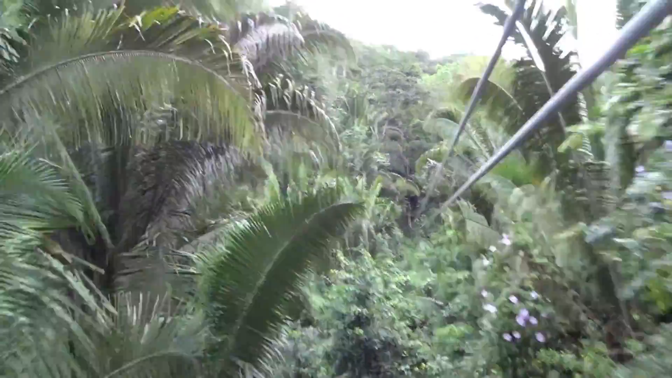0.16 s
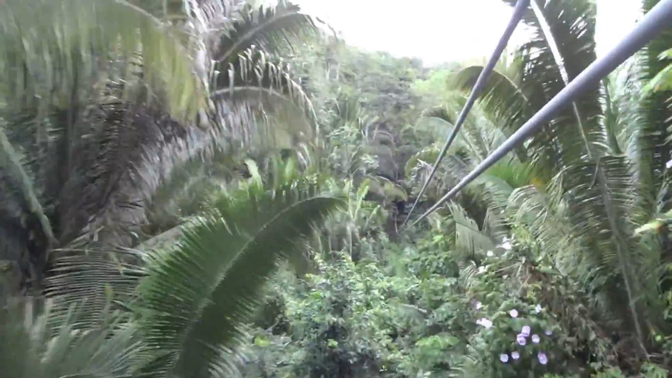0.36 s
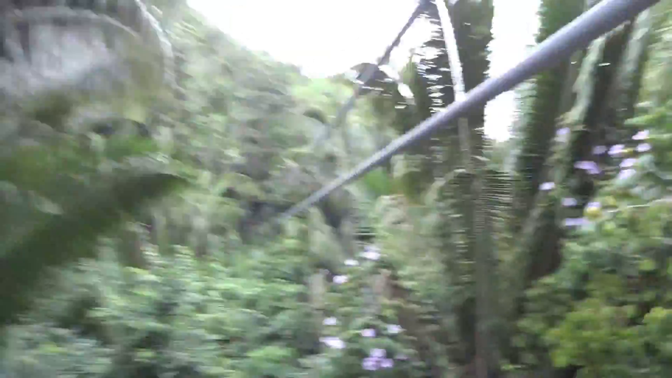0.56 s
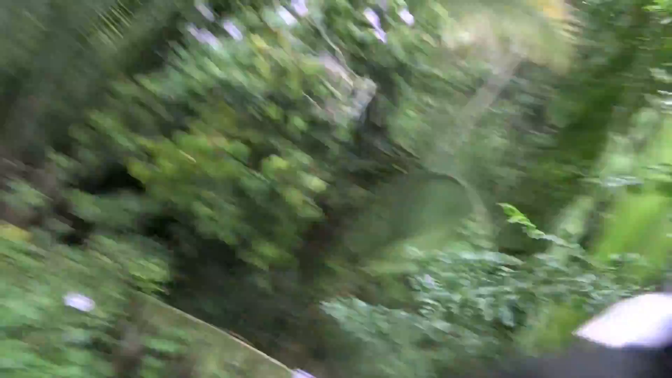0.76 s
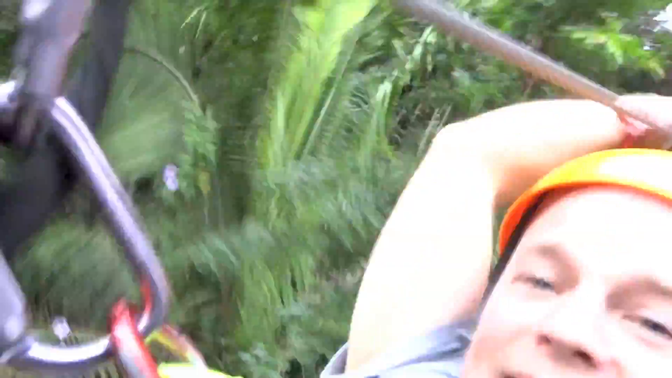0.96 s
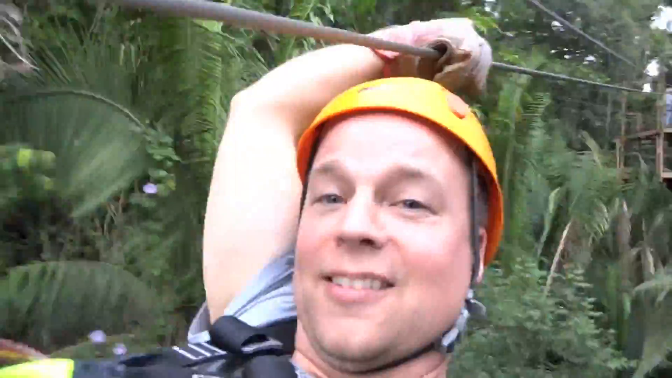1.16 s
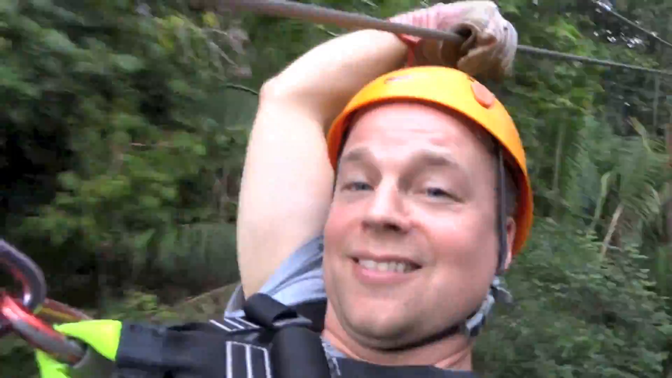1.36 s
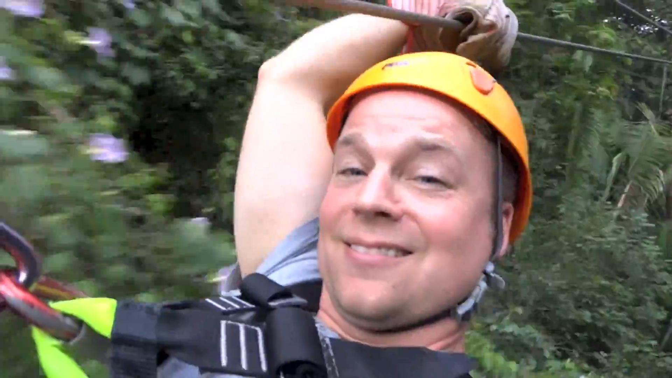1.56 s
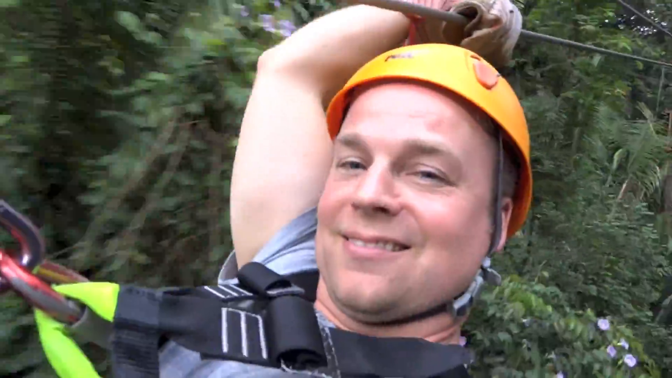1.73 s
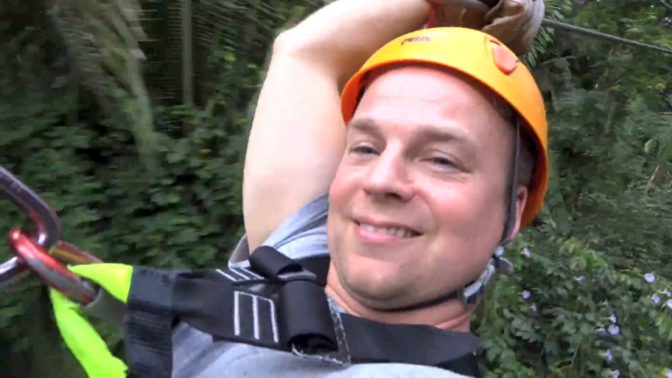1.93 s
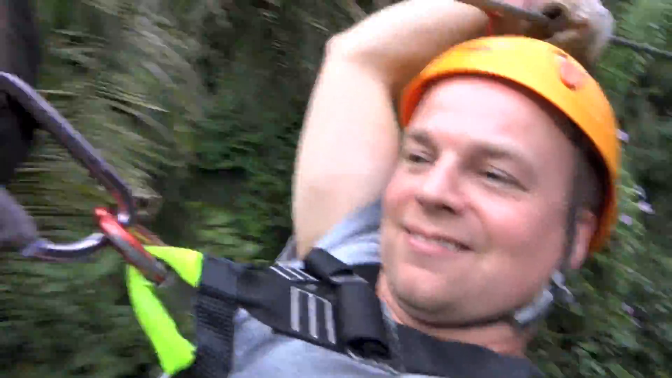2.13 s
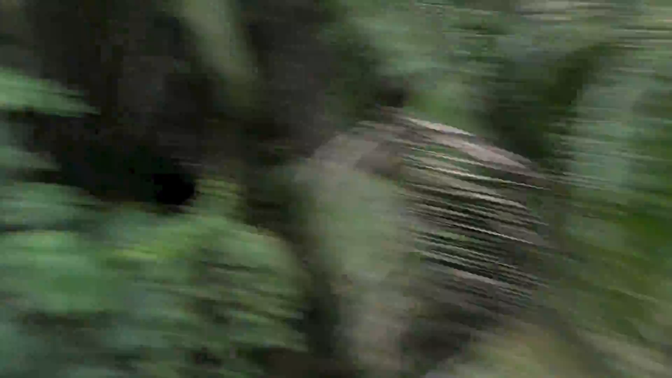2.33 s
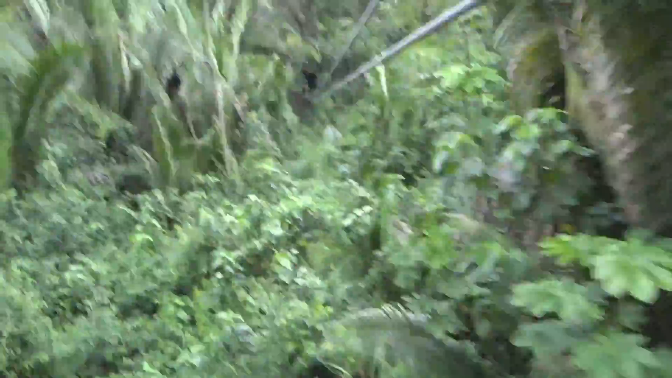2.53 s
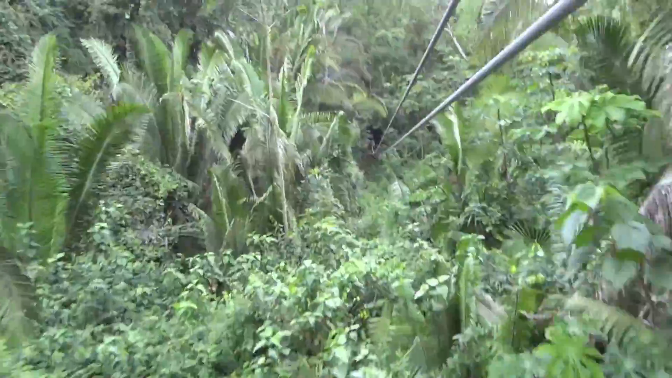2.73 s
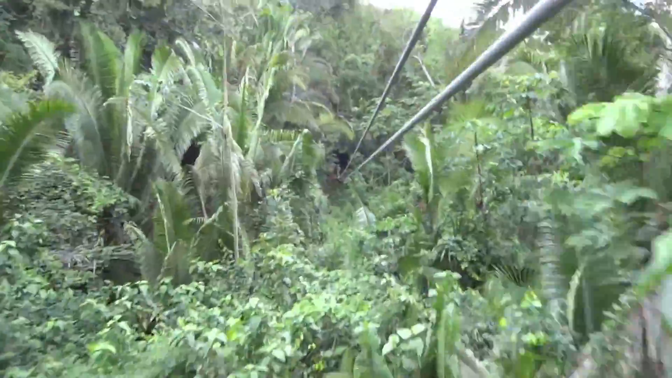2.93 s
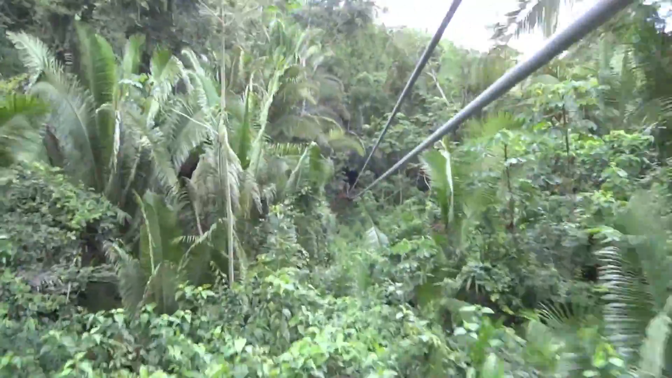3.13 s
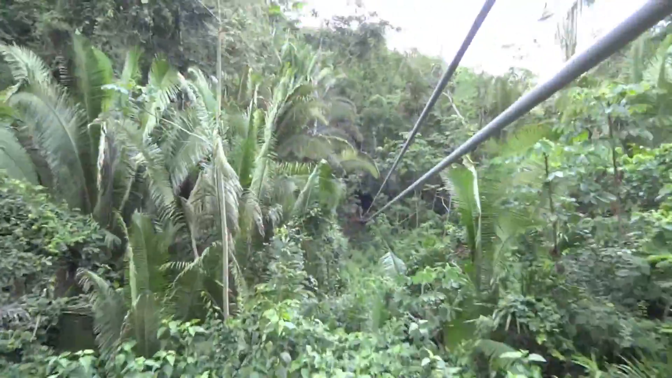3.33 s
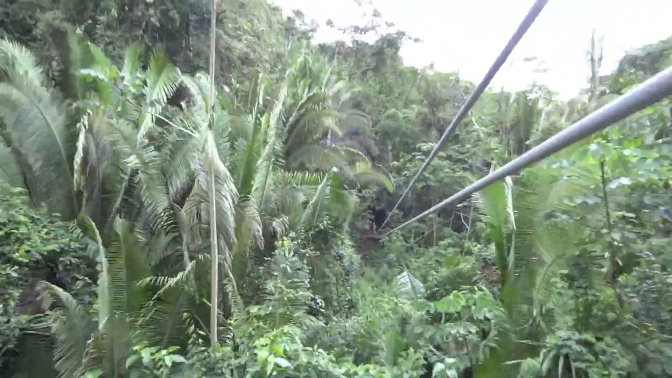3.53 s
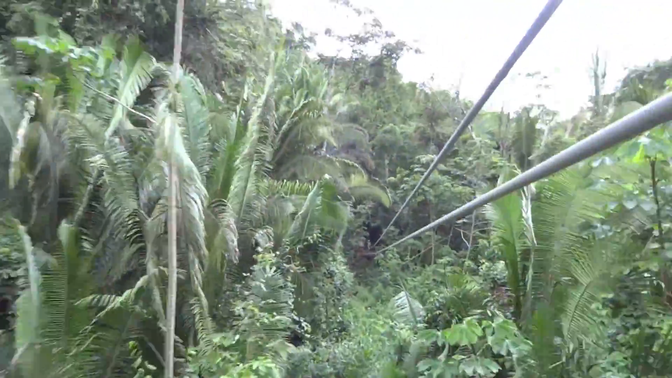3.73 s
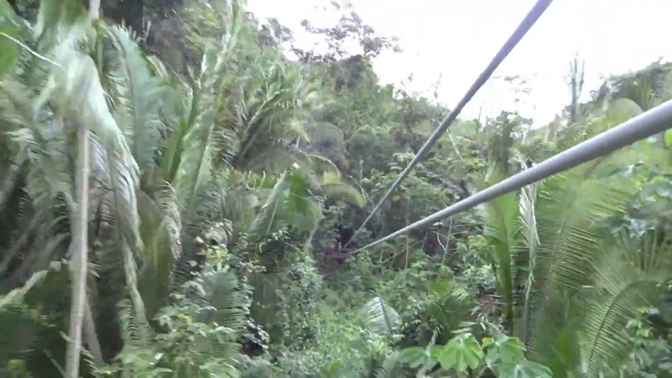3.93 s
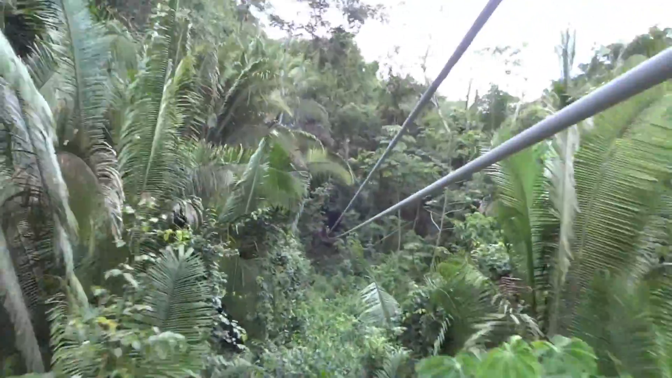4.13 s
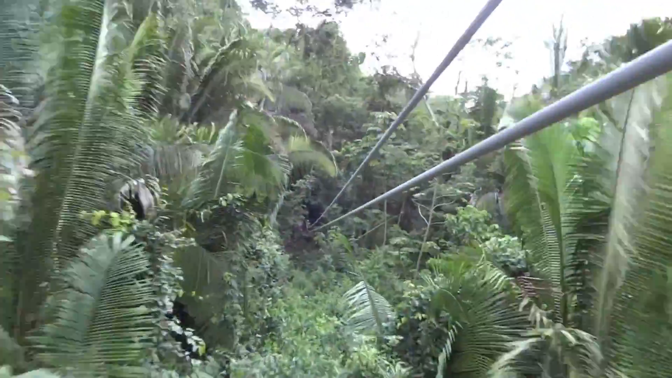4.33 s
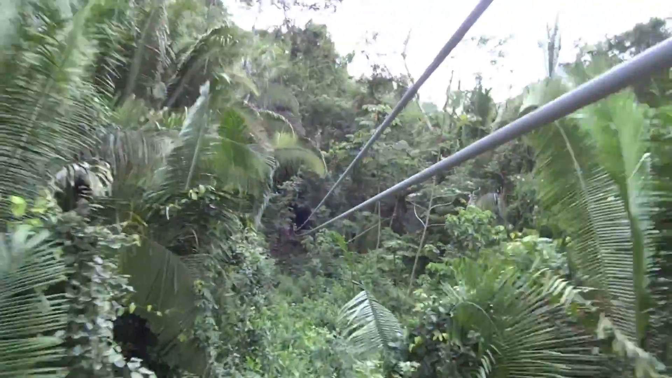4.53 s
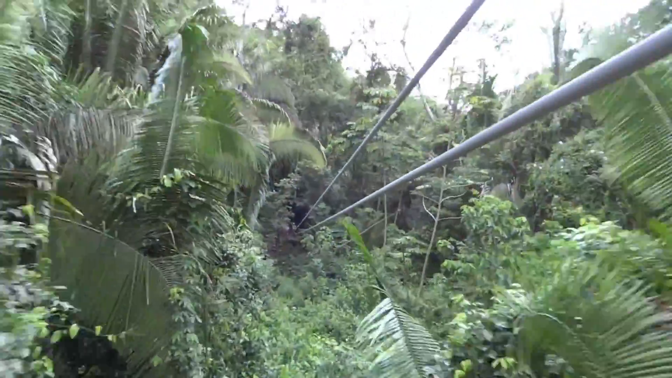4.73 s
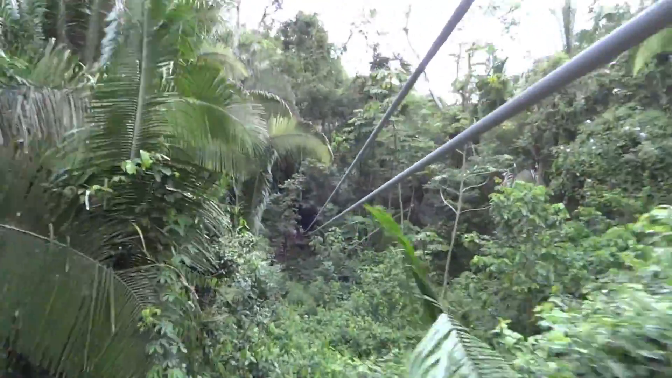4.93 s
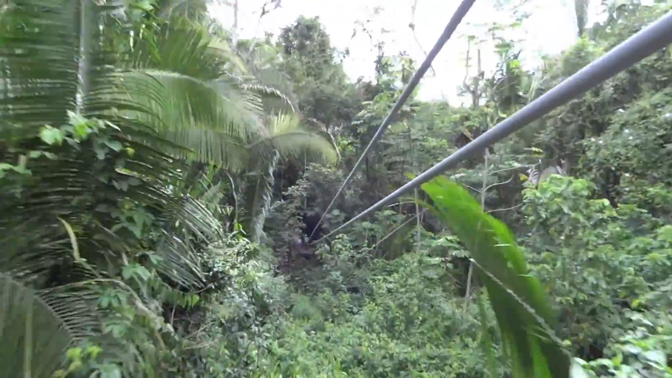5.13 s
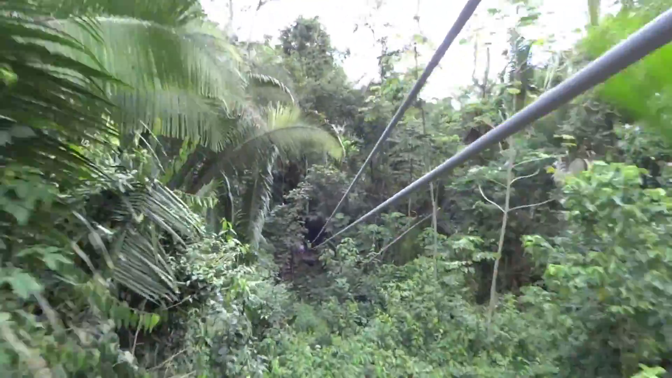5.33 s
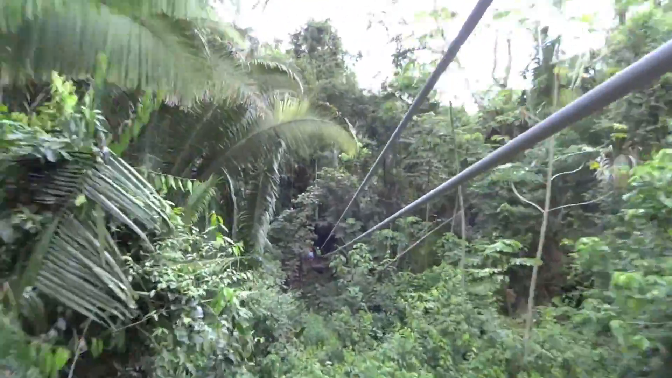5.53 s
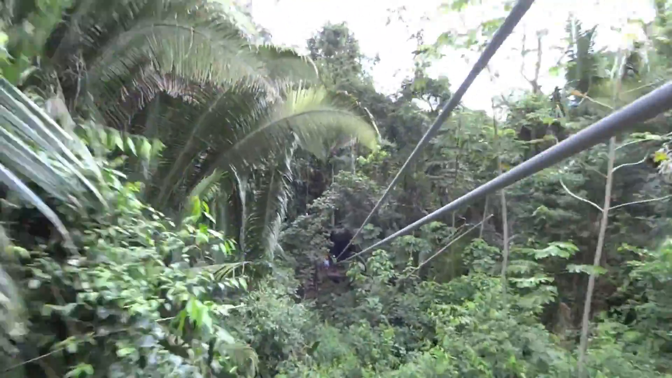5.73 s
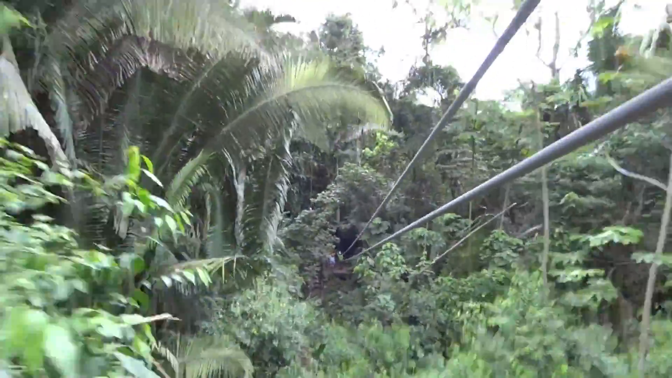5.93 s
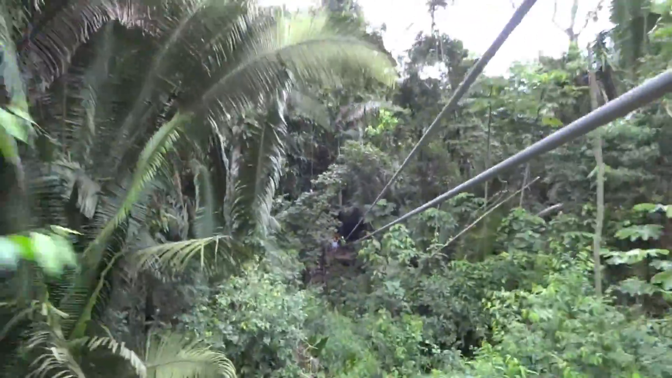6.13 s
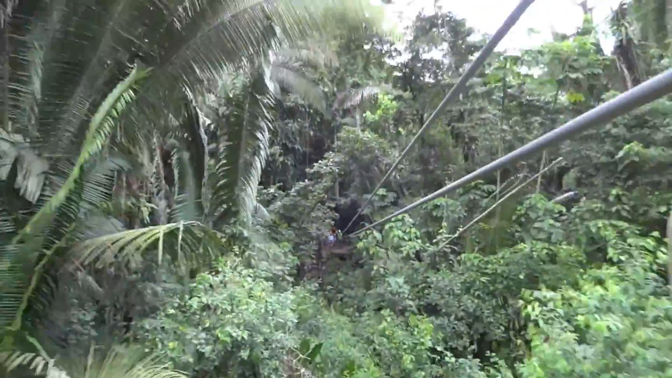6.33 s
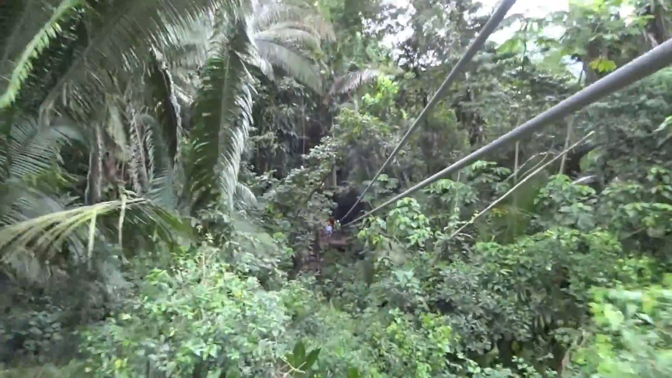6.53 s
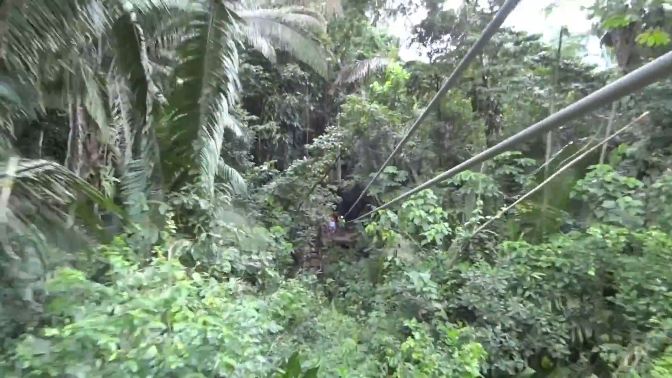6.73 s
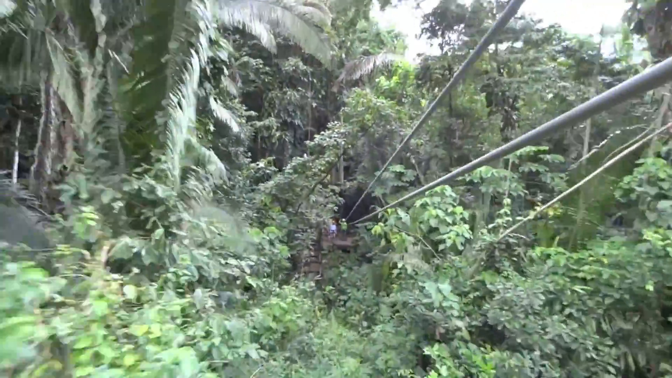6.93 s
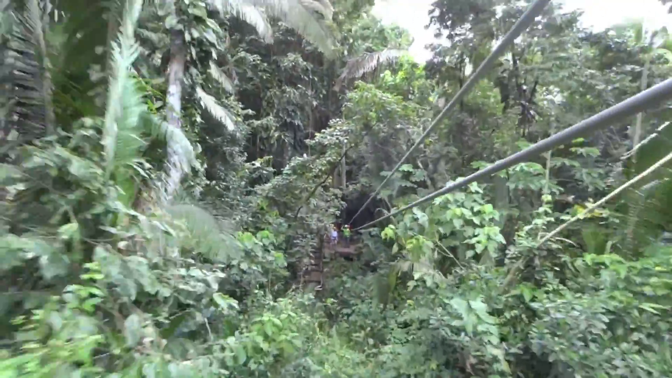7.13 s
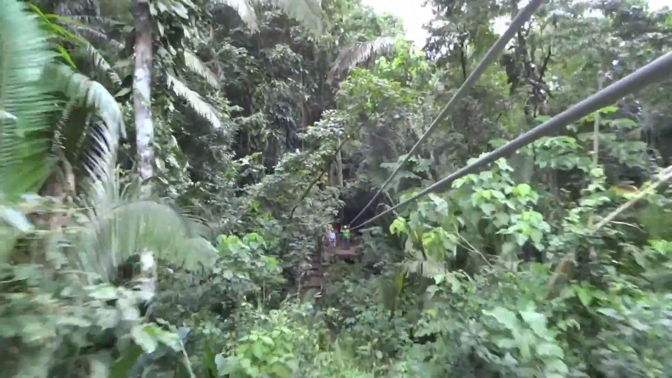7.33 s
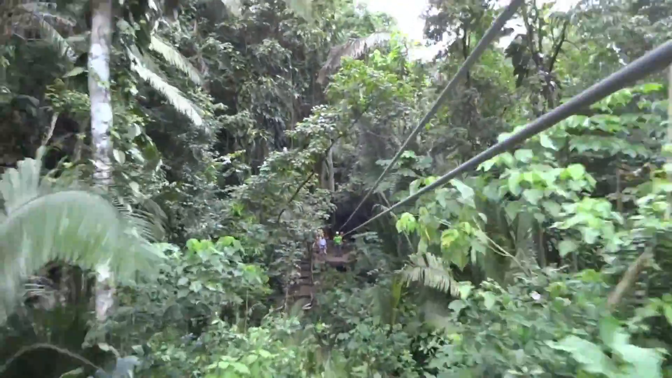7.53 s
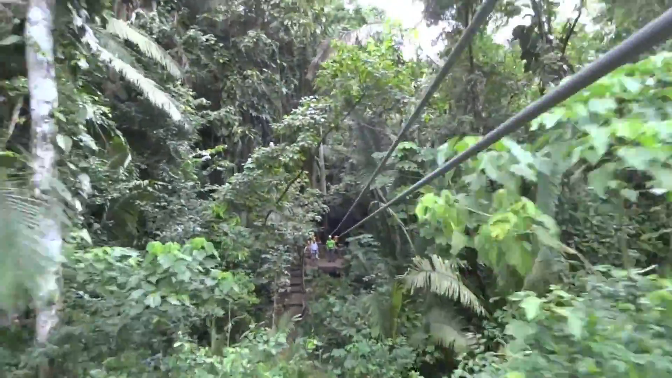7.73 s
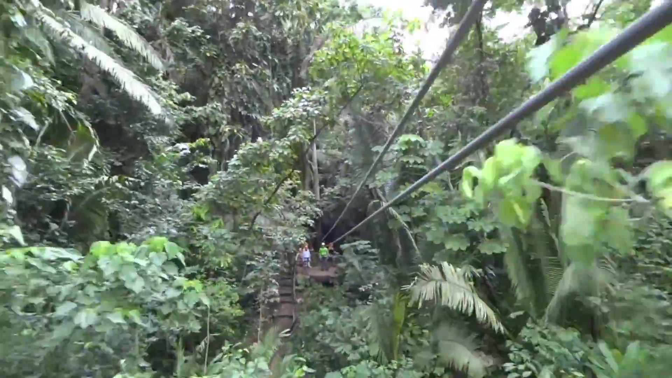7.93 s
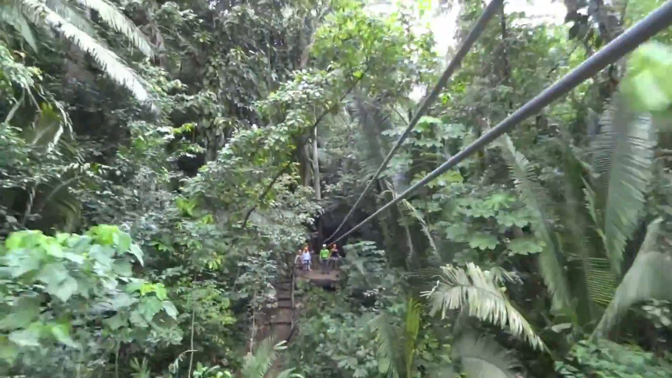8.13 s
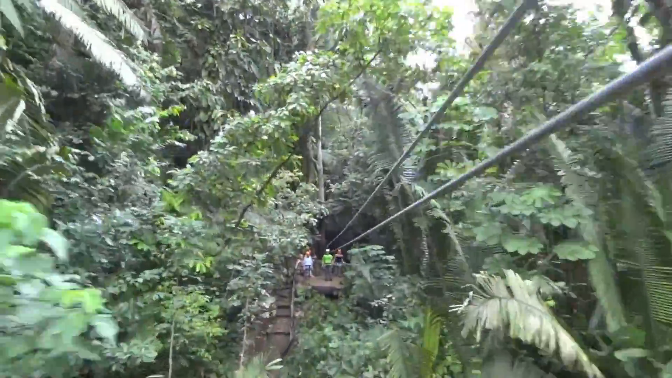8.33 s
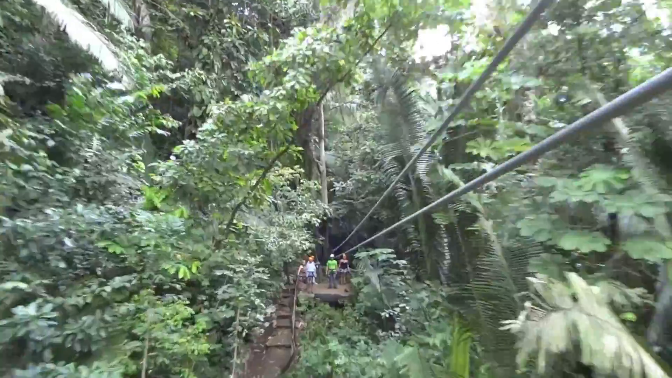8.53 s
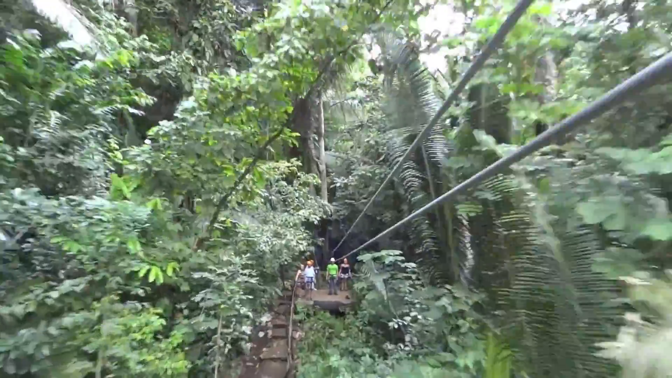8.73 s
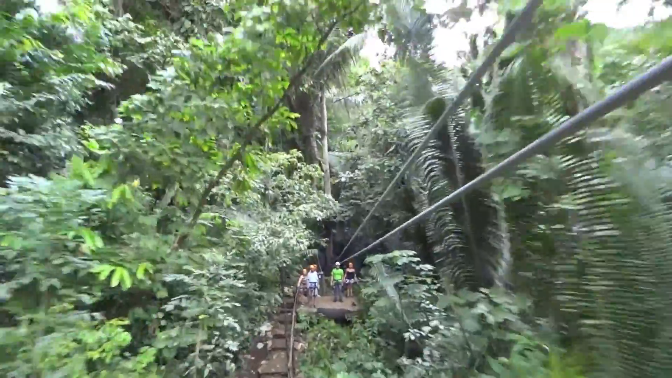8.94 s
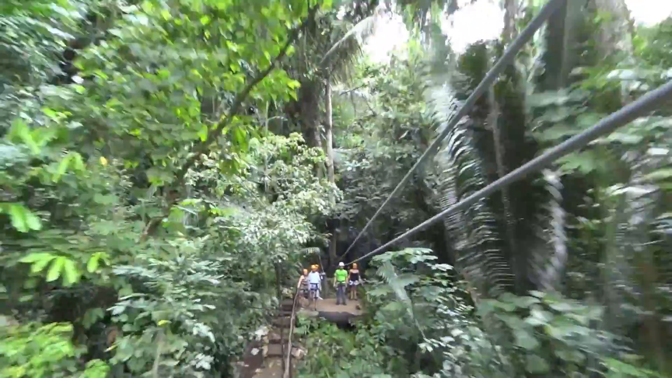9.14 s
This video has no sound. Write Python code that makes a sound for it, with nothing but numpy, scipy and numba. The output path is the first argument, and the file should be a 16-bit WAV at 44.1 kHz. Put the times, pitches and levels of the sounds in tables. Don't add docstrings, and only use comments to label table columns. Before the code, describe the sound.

Zip-line trolley wheels whir and sing shrilly along a steel cable, with low wind buffeting the microphone and bright air rushing past outdoors.

```python
import sys
import numpy as np
from scipy import signal
from scipy.fft import rfft, irfft, next_fast_len
from scipy.io import wavfile
from scipy.ndimage import uniform_filter1d
from numba import njit

SR = 44100
rng = np.random.default_rng(int(sys.argv[2]) if len(sys.argv) > 2 else 0)


def field_ratio(decibels):
    return 10 ** (np.asarray(decibels, dtype=float) / 20)


def waveform_to_disk(signal):
    frames = np.transpose(np.atleast_2d(signal))
    scaled = np.clip(frames, -1, 1) * 32767
    samples = np.round(scaled).astype(np.int16)
    wavfile.write(sys.argv[1], SR, samples)


N = 408807
SECONDS = np.arange(N) / SR
HZ = np.maximum(np.arange(N // 2 + 1) * SR / N, 1)

# time in seconds, centre in Hz.
CHATTER_HZ = [(0, 2960), (.2, 3000), (.3, 3020), (.42, 3470), (.5, 3040), (.56, 2680), (.62, 3300),
              (.7, 3400), (.8, 3300), (1, 3590), (9.27, 3550)]
# time in seconds, level in dB.
APART = [(0, -18), (.6, -17), (.68, 1), (9.27, -0.5)]
# time in seconds, share from 0 to 1.
TURNED = [
    (0, 0.04),
    (.9, 0.08),
    (.97, 0.28),
    (1.3, 0.94),
    (2.3, 0.91),
    (2.4, 0.64),
    (2.52, 0.16),
    (2.8, 0),
    (9.27, 0.02),
]


def rms_one(x):
    return x / np.sqrt(np.mean(x ** 2) + 1e-20)


def in_time(rows):
    s, *columns = np.transpose(rows)
    return [np.interp(SECONDS, s, c) for c in columns]


def at_hz(points):
    hz, value = np.transpose(points)
    return np.interp(np.log(HZ), np.log(hz), value)


def bumps(rows):
    s, *db, half = np.transpose(rows)
    distance = (SECONDS - s[:, None]) / half[:, None]
    return np.array(db) @ np.exp(-distance ** 2)


def colour(x, gain):
    return irfft(rfft(x) * gain, N)


def low_pass(x, hz):
    return signal.sosfilt(signal.butter(4, hz, fs=SR, output="sos"), x)


def drift(rate_hz):
    return rms_one(colour(rng.standard_normal(N), 1 / (1 + (HZ / rate_hz) ** 2)))


def envelope(x):
    return np.abs(signal.hilbert(x, next_fast_len(N))[..., :N])


def modes(x, table):
    out = 0
    for k, (hz, width_hz, level_db) in enumerate(table):
        r = np.exp(-1.55 * np.pi * width_hz / SR)
        b = (1 - r * r) / 2 * np.array([1, 0, -1])
        a = [1, -2 * r * np.cos(2 * np.pi * hz / SR), r * r]
        ringing = signal.lfilter(b, a, signal.lfilter(b, a, x))
        out = out + (-1) ** k * field_ratio(level_db) * ringing
    return out


@njit
def gliding(x, turn, r):
    out = np.zeros(len(x))
    for i in range(2, len(x)):
        c = 2 * r * np.cos(turn[i])
        out[i] = (1 - c + r * r) * x[i] + c * out[i - 1] - r * r * out[i - 2]
    return out


def ports(left, right, lag):
    # frequency in Hz, left louder in dB.
    stream_left_db = [(300, 8), (600, 0), (1200, 0.5), (3000, 1), (4500, 4), (5400, 6.5), (7000, 14),
                      (8500, -2), (9700, 6), (10800, 0.5)]
    still_left_db = [(300, -7), (2000, 3.5), (3330, 2.5), (5500, 8), (7600, 7), (9700, 10), (11000, -2),
                     (15000, -9)]
    # frequency in Hz, phase in radians.
    still_lag = [(2070, 0.05), (5080, 1.24), (6120, 2.6), (7240, 4.8), (9730, 4.1), (12300, 3.2),
                 (13100, 5.2), (15500, 5.9)]
    streaming = np.interp(SECONDS, [APART[1][0], APART[2][0]], [0, 1])
    out = 0
    for share, left_db, rad in ((streaming, stream_left_db, lag), (1 - streaming, still_left_db, still_lag)):
        tilt = field_ratio(at_hz(left_db) / 2) * np.exp(.5j * at_hz(rad))
        out = out + np.array([colour(left * share, tilt), colour(right * share, 1 / tilt)])
    return out


def stereo_noise(spectrum, likeness):
    alike, gain = np.clip(at_hz(likeness), 0, 1), field_ratio(at_hz(spectrum))
    mid, side = rng.standard_normal((2, N))
    mid = colour(mid, gain * np.sqrt(1 + alike))
    side = colour(side, gain * np.sqrt(1 - alike))
    scale = np.sqrt(np.mean(mid ** 2))
    return mid / scale, side / scale * field_ratio(in_time(APART)[0])


def wheel_levels():
    # time in seconds, plate level in dB.
    bite = [(0, -32.5), (.3, -31), (.48, -37), (.6, -37), (.72, -22.5), (.85, -20), (1.3, -18.7),
            (2.2, -19), (2.9, -21), (3.8, -19.5), (5.7, -18.5), (6.5, -19.5), (9.27, -20)]
    # time in seconds, level in dB.
    rim_level = [(0, -46), (.3, -44), (.4, -38), (.58, -44), (.66, -28), (.9, -27), (1.1, -30), (2.3, -31),
                 (2.65, -29), (3.0, -33), (3.9, -28), (4.5, -29), (5.3, -26.5), (5.9, -23), (7.3, -25),
                 (9.27, -22.5)]
    # time in seconds, chatter in dB, rim in dB, half length in seconds.
    patches = [(.12, 2, 7, 0.11), (.62, 1, 1.5, 0.089), (1.0, 3, 1, 0.33), (4.25, -0.5, 4, .07),
               (4.73, -0.5, 4.5, .12), (6.45, .3, 1.5, .15), (7.95, 2, 1, .2), (8.15, 0.5, -2.5, .08),
               (8.35, 2, 0, 0.055), (8.55, .5, -2.5, 0.087), (8.75, -0.5, 1.5, .07), (9.05, .5, 4, 0.036)]
    bite_db = in_time(bite)[0]
    patch_db, ring_db = bumps(patches)
    full_bite_db, rim_turned_db = -19, 12.5
    chatter_db = -29.5 + np.minimum(-.5 * (bite_db - full_bite_db), 7.5) + 0.16 * SECONDS
    rim_db = in_time(rim_level)[0] + rim_turned_db * in_time(TURNED)[0] + ring_db
    return chatter_db + patch_db, rim_db, bite_db


def low_chatter(front, rear):
    # frequency in Hz, width in Hz, level in dB.
    frame_modes = [(3303, 48, 3), (6650, 500, -19.5)]
    width_hz = 1056
    turn, r = 2 * np.pi * in_time(CHATTER_HZ)[0] / SR, np.exp(-np.pi * width_hz / SR)
    thin = signal.sosfilt(signal.butter(2, 1400.0, "high", fs=SR, output="sos"), front)
    band = low_pass(gliding(gliding(thin, turn, r), turn, r), 4120.0)
    return rms_one(band + field_ratio(16.5) * modes(rear, frame_modes))


def singing_rim(front, rear):
    # frequency in Hz, width in Hz, level in dB.
    rim_pair = [(3680, 57.5, 9.5), (3705, 200, -2.5)]
    high_pair = [(11780, 220, -23), (12340, 160, -23)]
    steadiness, steady_s = .55, .12
    sing = modes(front, rim_pair) + modes(rear, high_pair)
    held = uniform_filter1d(envelope(sing), size=int(steady_s * SR))
    return rms_one(sing / held ** steadiness * field_ratio(0.27 * drift(12.0)))


def side_plates(rear, plates_db):
    # frequency in Hz, width in Hz, level in dB.
    plate_modes = [(4414, 1290, -8.5), (4770, 360, 0), (5184, 310, -3)]
    plate_overtone = [(9740, 580, -12.5)]
    evenness = .3
    plates = rms_one(modes(rear, plate_modes))
    plates = plates / (envelope(plates) + 0.052) ** evenness
    plates = rms_one(low_pass(low_pass(plates, 5800.0), 6840.0))
    overtone_db = 13.0 + 0.36 * (plates_db + 20.5) + 1 * in_time(TURNED)[0]
    return plates + field_ratio(overtone_db) * modes(rear, plate_overtone)


def trolley():
    chatter_db, rim_db, plates_db = wheel_levels()
    contacts_per_s = 12000.0
    front, rear = rng.standard_normal((2, N)) * (rng.random((2, N)) < contacts_per_s / SR)
    whir = field_ratio(chatter_db) * low_chatter(front, rear)
    whir = whir + field_ratio(rim_db - 0.23) * singing_rim(front, rear)
    whir = whir + field_ratio(plates_db - 2.0) * side_plates(rear, plates_db)
    overload, knee = .5, 2.0
    return whir / (1 + (envelope(whir) / overload) ** knee) ** (1 / knee)


def growl():
    # frequency in Hz, width in Hz, level in dB.
    hanger_modes = [(1600, 900, -6), (1935, 150, 2), (14300, 500, -17)]
    contacts = rng.standard_normal((3, N)) * (rng.random((3, N)) < 8000.0 / SR)
    groan = sum(modes(c, [mode]) for c, mode in zip(contacts, hanger_modes))
    low_hz, span_hz, fade_db = 2680, 853, 19.5
    risen = (in_time(CHATTER_HZ)[0] - low_hz) / span_hz
    return field_ratio(-23 - fade_db * risen ** 2 - 8.5) * rms_one(groan)


def wind_levels():
    # time in seconds, level in dB.
    headwind = [(0, -29.5), (.3, -28.5), (.9, -32.5), (2.5, -28), (2.75, -26), (3.6, -26.5), (4.0, -26),
                (4.7, -27), (5.5, -26), (7.4, -27), (8.1, -28), (9.27, -28)]
    # time in seconds, roar in dB, rumble in dB, half length in seconds.
    puffs = [(.14, 1, -6, 0.073), (.44, 6.5, 5, 0.056), (.66, 2, -1, .06), (.88, 2.5, 9, 0.052),
             (1.14, 3, 3, 0.041), (1.65, 0, 4, .03), (1.75, -2, 3, .03), (2.17, 0.5, 5, .04),
             (2.435, 12.5, 9.5, 0.034), (2.64, 2.5, -3, 0.057), (2.95, 0.5, 5, 0.1), (3.3, 1, 3, 0.052),
             (3.6, 1.5, 4, 0.071), (4.15, 0, 0, 0.13), (4.93, -1, 4, .08), (5.45, 1.5, 3.5, .1)]
    shelter_db, sheltered_rumble_db = -13.5, -43
    roar_db = in_time(headwind)[0] + shelter_db * in_time(TURNED)[0]
    roar_puff, rumble_puff = bumps(puffs)
    rumble_db = np.maximum(-35.5 + 0.71 * (roar_db + 27.5), sheltered_rumble_db)
    rumble_db = rumble_db + 1.4 * drift(5.6) + rumble_puff
    edge_db = -38.0 + 0.8 * (roar_db + 27.0) + 1.3 * roar_puff + 0.71 * in_time(APART)[0]
    return rumble_db, roar_db + roar_puff, edge_db


def wind():
    # frequency in Hz, level in dB per Hz.
    rumble_colour = [(20, -22), (40, -11.5), (70, -3.5), (110, -1), (160, -4.5), (300, -22), (600, -59)]
    roar_colour = [(70, -46), (130, -3.5), (200, -1), (320, -0.5), (500, -4.5), (800, -9.5), (1200, -22),
                   (2000, -22), (4000, -51)]
    edge_colour = [(250, -41), (550, 1), (850, -2.5), (1300, -6), (2500, -30)]
    # frequency in Hz, likeness from 0 to 1.
    wind_likeness = [(30, .985), (90, .972), (160, .93), (270, .74), (450, .38), (740, .05), (1200, 0)]
    out = 0
    for level_db, spectrum in zip(wind_levels(), (rumble_colour, roar_colour, edge_colour)):
        mid, side = stereo_noise(spectrum, wind_likeness)
        out = out + field_ratio(level_db + 0.41 * drift(30.0)) * np.array([mid + side, mid - side])
    return out * field_ratio(np.array([[-.2], [.2]]))


def air_levels():
    # time in seconds, level in dB.
    airstream = [(0, -50), (.1, -51), (.35, -50), (.6, -49), (.68, -54), (.8, -45), (1.0, -39.5),
                 (1.3, -40), (1.8, -42), (2.35, -40), (2.8, -43), (4.2, -39), (5.6, -37.5), (7.0, -39.5),
                 (8.0, -39.5), (8.45, -42), (9.27, -42)]
    rush_db = in_time(airstream)[0]
    hiss_db = -40.0 + np.maximum(.8 * (rush_db + 41.0), -2.5) + 6 * in_time(TURNED)[0]
    return rush_db, hiss_db + 3 * drift(3.0)


def thin_top(hiss_db):
    # frequency in Hz, level in dB per Hz.
    hiss_colour = [(11000, -40), (12400, -18), (13300, -7), (14300, 0), (15000, 0), (15800, 1.5)]
    # time in seconds, level in dB, half length in seconds.
    whistle_swell = [
        (.49, 22.0, 0.27),
    ]
    # frequency in Hz, width in Hz, level in dB.
    whistle_mode = [(14350, 650, -58)]
    hiss = rms_one(colour(rng.standard_normal(N), field_ratio(at_hz(hiss_colour)) * (HZ > 9000)))
    whistle = field_ratio(bumps(whistle_swell)[0]) * modes(rng.standard_normal(N), whistle_mode) * 4.4
    return field_ratio(hiss_db + 1.2 * drift(60.0)) * hiss + whistle


def rush(whir):
    # frequency in Hz, level in dB per Hz.
    rush_colour = [(150, -22), (500, 6.5), (1000, 8), (1700, 5), (2600, 7.5), (5600, 1), (6500, 3),
                   (7500, 0), (8400, -1.5), (10500, 3), (12200, 0.5), (13300, 0), (14500, -0.5),
                   (15800, 0.5)]
    # frequency in Hz, likeness from 0 to 1.
    rush_likeness = [(800, .6), (2200, .5), (3000, .7), (5600, .3), (7500, .3), (9000, .5), (10600, .75),
                     (12300, .75), (12900, .97)]
    # frequency in Hz, phase in radians.
    air_lag = [(250, 3), (800, 1.5), (1600, 2.1), (2900, 1.3), (5700, 2.5), (7100, 2.5), (8400, 6),
               (10000, 11), (10600, 5), (13000, 7)]
    rush_db, hiss_db = air_levels()
    mid, side = stereo_noise(rush_colour, rush_likeness)
    height = uniform_filter1d(envelope(whir), size=40)
    shaking = (height / uniform_filter1d(height, size=8000)) ** 0.44
    flicker = field_ratio(.8 * drift(8.0)) * field_ratio(1.1 * drift(250.0)) * shaking
    gain = field_ratio(rush_db + 12 + 1.0 * in_time(APART)[0]) * flicker
    top = thin_top(hiss_db)
    return ports(gain * (mid + side) + top, gain * (mid - side) + top, air_lag)


def scene():
    # frequency in Hz, phase in radians.
    trolley_lag = [(1500, 0.33), (2900, 0.42), (4200, 0.48), (5700, 1.4), (7100, 4.7), (8400, 9.8),
                   (10000, 5.36), (10600, 3.7), (13000, 8.3)]
    whir = trolley()
    near = whir + growl()
    return field_ratio(3.0) * ports(near, near, trolley_lag) + wind() + rush(whir)


def top_cut(x):
    return signal.sosfilt(signal.butter(12, 17020, fs=SR, output="sos"), x)


def record(dry):
    cutoff_hz = 15740
    mix = colour(dry, HZ < cutoff_hz)
    return top_cut(mix)


dry = scene()
out = record(dry)
waveform_to_disk(out)
```